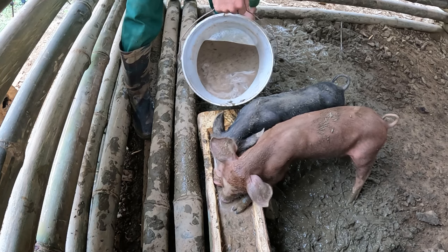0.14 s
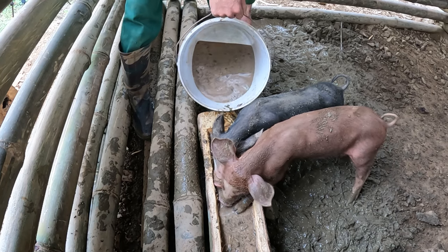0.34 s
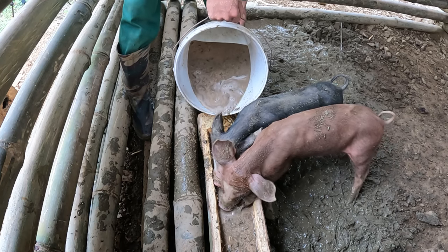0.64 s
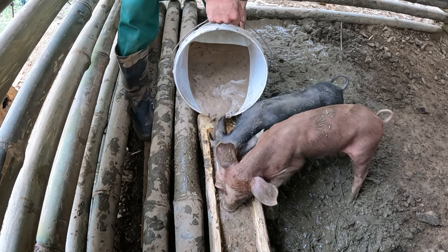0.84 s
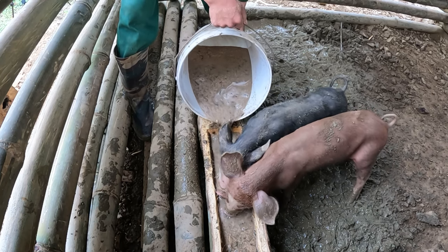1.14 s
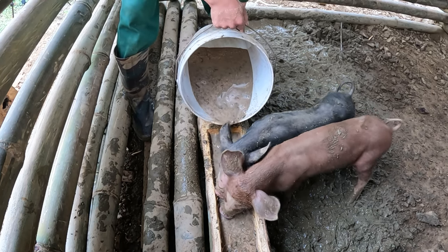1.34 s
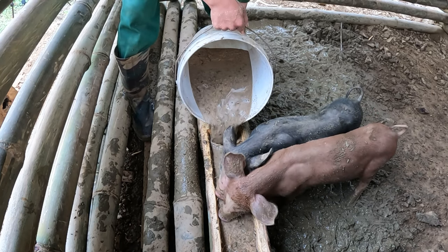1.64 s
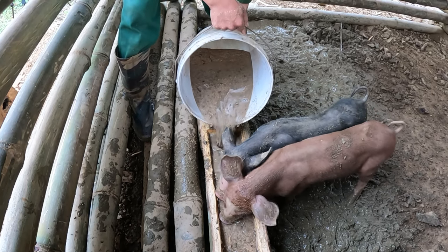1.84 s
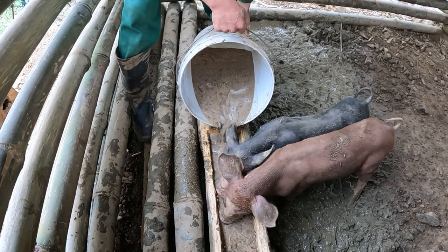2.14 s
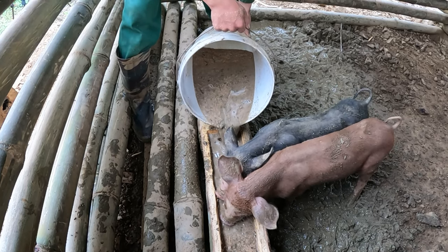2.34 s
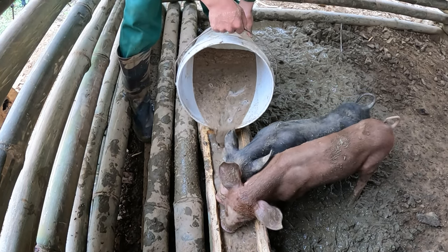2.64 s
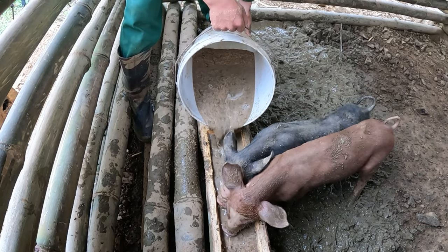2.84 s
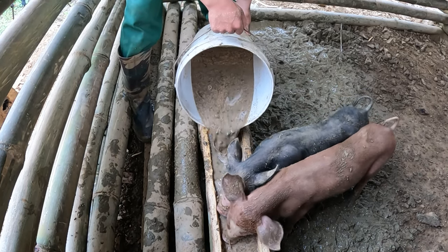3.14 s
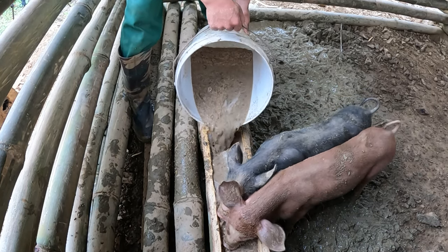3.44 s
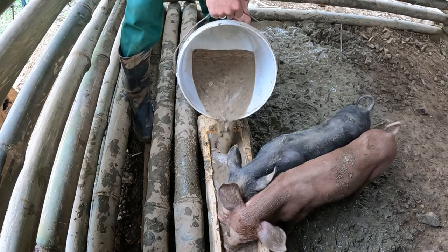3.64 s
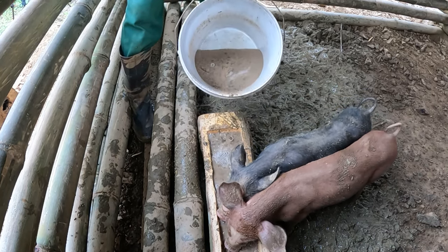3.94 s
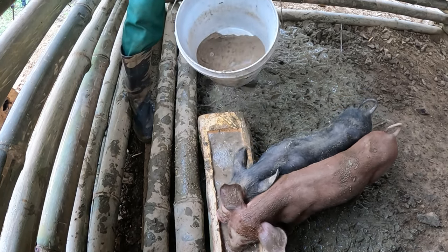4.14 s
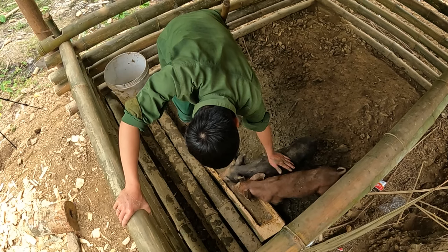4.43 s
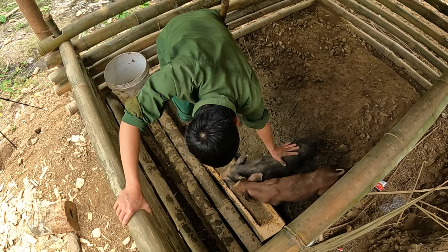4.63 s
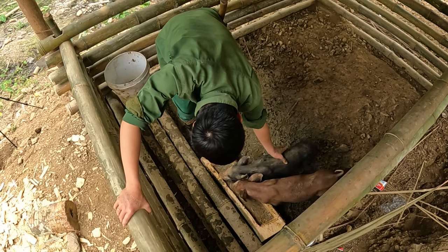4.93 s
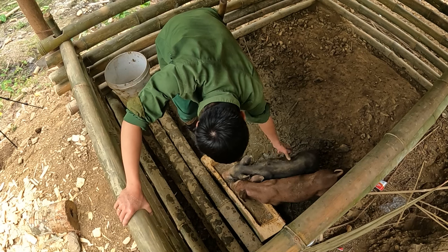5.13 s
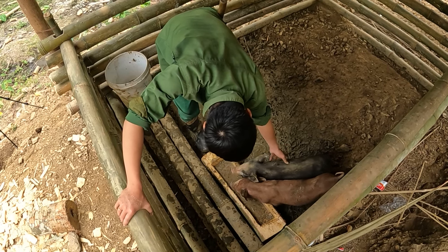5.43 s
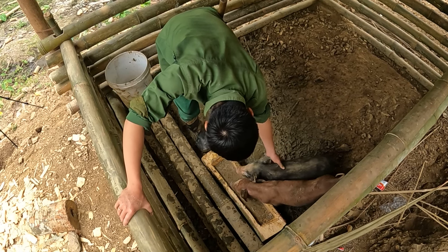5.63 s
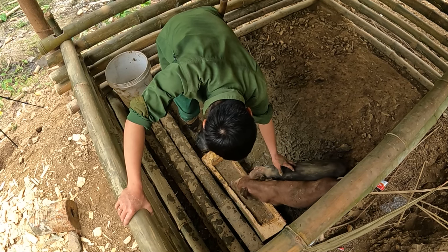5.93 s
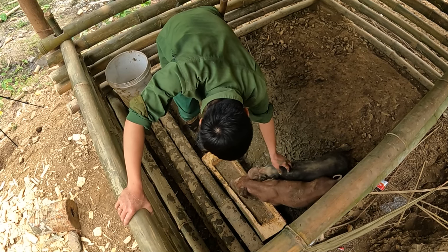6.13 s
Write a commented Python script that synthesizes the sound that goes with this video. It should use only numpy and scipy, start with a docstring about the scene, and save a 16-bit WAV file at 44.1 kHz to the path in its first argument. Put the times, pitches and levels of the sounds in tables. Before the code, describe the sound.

Very close outdoor pickup of two piglets eating at a trough. Thick wet feed gurgles and splatters as it pours, while rapid juicy smacks, chews, squelches and short slurps overlap, with soft low bumps on the trough. After about four seconds the close feeding stops abruptly, leaving a few faint, slightly echoing smacks over low wind rumble and thin outdoor hiss.

```python
"""Two piglets feed at a wooden trough in an open bamboo pen; a light wind and outdoor hiss, both noise, run
throughout. From the start wet mash pours in, random bubbles and clicks, while smacks and chews ring a mouth
cavity with wet bursts. From 0.2 s come sips of hissing grains, bumps of decaying sines and hollow squelches;
from 0.9 s gliding air plops. At 4.37 s the close sounds stop abruptly and the mash falls away. A few weaker,
more echoing smacks and squelches follow, with soft chews and sips, as the wind eases."""
import sys
import numpy as np
from scipy import signal
from scipy.fft import rfft, irfft, next_fast_len
from scipy.io import wavfile

SR = 44100
rng = np.random.default_rng(int(sys.argv[2]) if len(sys.argv) > 2 else 0)


def wav_out(sig):
    """Save sig, one row per channel (or a flat mono array), as 16-bit PCM at SR to the path in sys.argv[1]."""
    wavfile.write(sys.argv[1], SR, np.round(np.clip(np.atleast_2d(sig).T, -1, 1) * 32767).astype(np.int16))


N = 276948

# Outdoor hiss, spectrum shape. Each row: frequency in Hz, density in dB per Hz.
AIR_SPECTRUM = [(200, -8), (500, 7), (900, -21.5), (1350, 10.5), (2700, 2.5), (3800, 8), (5700, -1),
                (6900, 5.5), (7700, 1.5), (8700, -14.5), (12000, -10.5), (16000, -36)]
AIR_DB = -52

# Wind rumble, spectrum shape. Each row: frequency in Hz, density in dB per Hz.
WIND_SPECTRUM = [(8, -0.5), (22, 3.5), (40, -5.5), (60, -12.5), (100, -20), (170, -28), (300, -43),
                 (700, -87)]
# start level before the channel balance; rms gust swing; rate of gust turning points
WIND_DB, WIND_EASES_DB_PER_S, GUST_DB, GUSTS_PER_S = -27.5, 0.8, 2.5, 9

# Strength of the running, stirred mash, before the trims in mash().
# Each row: time in seconds, splatter level in dB, spray level in dB.
MASH_LEVELS = [(0.0, -17, -49), (0.31, -45, -50.5), (0.5, -23.5, -40), (0.7, -26.5, -40),
               (1.2, -22.5, -30.5), (1.55, -26.5, -34.5), (2.05, -23.5, -31.5), (2.22, -33, -38),
               (2.45, -22.5, -35.5), (2.8, -26.5, -27), (2.95, -26.5, -37), (3.15, -21, -32),
               (3.45, -22.5, -27.5), (3.9, -23.5, -31), (4.18, -34, -42.5), (4.36, -28, -40),
               (4.41, -55, -68), (4.52, -37, -46), (4.85, -55.5, -64.5), (5.22, -56.5, -54.5),
               (6.0, -46.5, -45), (6.28, -48, -47.5)]
# Splatter clicks, spectrum shape. Each row: frequency in Hz, density in dB per Hz.
SPLATTER_SPECTRUM = [(200, -24), (400, -32), (700, -17), (1000, 3), (1500, -14), (2200, -7), (3300, -2.5),
                     (4300, -21.5), (6000, -48.5), (12000, -53)]
GURGLE_DB = -16.5   # large bubbles, relative to the splatter
BLIP_DB = -5.5   # longer-ringing bubbles, relative to the middle ones

# Smacks of lips and tongue. Each row: start in seconds, mouth level in dB over 10 ms, cavity pitch in Hz,
# burst spread in seconds, spray in dB re mouth, jaw opening in dB re smack.
SMACKS = [(0.002, -20.5, 1620, 0.0068, -30, -8), (0.096, -14.5, 950, .009, -4.5, -11.5),
          (0.152, -22, 2060, 0.015, -24, -14), (0.353, -27, 1230, 0.011, -30, -29),
          (0.423, -15.5, 1660, 0.0029, -34, -29), (0.502, -13, 3000, 0.0043, -29, -6),
          (0.613, -25, 1150, 0.0042, -30, -5), (0.749, -25, 2830, 0.01, -9.5, -1.5),
          (0.871, -10.5, 1740, 0.005, -20.5, -15), (0.923, -20, 1180, 0.0057, -13, -4),
          (0.939, -15.5, 1270, 0.0042, -13, -24), (1.0, -21, 2400, 0.0099, -9.5, -17),
          (1.028, -11, 1740, .004, -19, -21), (1.061, -22.5, 2200, 0.0024, -14, -26),
          (1.178, -17.5, 950, 0.0056, -36, -1), (1.2, -13, 3220, 0.0047, -27, -22),
          (1.377, -25.5, 1180, 0.0098, -8, -9.5), (1.412, -21, 1440, 0.011, -24, -14.5),
          (1.437, -17, 2970, 0.0077, 1, 3), (1.481, -23.5, 1820, 0.0053, -11, -8),
          (1.547, -26, 910, 0.0059, -32, -11), (1.649, -22, 1490, 0.0061, -10.5, -10),
          (1.68, -24.5, 1900, 0.0046, -11, -9), (1.839, -18.5, 1250, 0.007, -5, -2.5),
          (1.851, -10.5, 2000, 0.0089, -16.5, -17), (2.011, -21, 2050, 0.017, -16, -4),
          (2.044, -16.5, 1960, 0.0092, -13, -4), (2.26, -18.5, 1940, 0.011, -15.5, -10),
          (2.283, -14, 1140, 0.0089, -11.5, -18), (2.339, -21.5, 1074, .008, -13.5, -12),
          (2.421, -21, 1680, 0.0069, -21, -0.5), (2.513, -21, 1020, 0.0083, 1, 0.5),
          (2.549, -15.5, 1340, .005, -18, -15), (2.705, -17, 1110, 0.0099, 3.5, -2.5),
          (2.764, -18.5, 1130, .004, -25, -7), (2.833, -19, 3700, 0.0048, -8.5, -17),
          (2.996, -15.5, 1000, 0.0044, -12.5, -6.5), (3.117, -19.5, 1820, .007, -9.5, -5),
          (3.176, -21, 970, .010, -28, 4.5), (3.201, -19.5, 1830, 0.0067, -0.5, -0.5),
          (3.33, -28, 940, 0.0086, -2, -27), (3.393, -15, 2650, 0.0045, -10.5, -14.5),
          (3.431, -11, 1010, .006, -5.5, -20), (3.493, -16.5, 990, 0.0044, -15.5, -22),
          (3.594, -13, 1840, 0.0042, -31, -13), (3.695, -20, 970, 0.0093, -10, -11),
          (3.931, -24, 1100, 0.0059, -7, 1.5), (3.992, -27, 1240, 0.0042, -8, -27),
          (4.046, -8.5, 1830, 0.0072, -13.5, -18), (4.25, -11, 1770, 0.0038, -12.5, -16.5),
          (4.295, -27, 3380, 0.0062, -14, -11), (4.346, -15, 2940, 0.0039, -12, -3),
          (4.472, -35.5, 1380, .009, -20, -31), (4.698, -18.5, 1970, 0.0033, -10.5, -29),
          (4.707, -19.5, 3270, 0.0062, -12.5, -17), (4.781, -34, 1270, 0.0031, -14, -10),
          (4.956, -19, 3210, .003, -7, -18), (5.065, -32, 1320, 0.014, -16, -10.5),
          (5.321, -40.5, 3470, 0.0086, -8, -20), (5.734, -33.5, 3640, .003, -16, -27),
          (5.774, -40, 3260, 0.0062, -7, -18), (5.984, -36, 1780, 0.022, -9.5, -36),
          (6.012, -42, 2330, .012, -4, -29), (6.204, -44.5, 2190, 0.0062, -13, -31)]
# Wet films in the mouth, spectrum shape. Each row: frequency in Hz, density in dB per Hz.
MOUTH_SPECTRUM = [(350, -24), (650, -10), (950, 0.5), (1400, 4), (2000, 6), (3200, 7), (4200, -4.5),
                  (6000, -9), (12000, -82)]
# Fine spray of mouth and mash, spectrum shape. Each row: frequency in Hz, density in dB per Hz.
SPRAY_SPECTRUM = [(3000, -6), (4300, 2), (6400, 0), (8000, -5.5), (9200, -13), (10500, -11), (13000, -24.5),
                  (16000, -63.5)]
# Low body of smacks and squelches, spectrum shape. Each row: frequency in Hz, density in dB per Hz.
HOLLOW_SPECTRUM = [(90, -16.5), (200, 7.5), (350, 11), (480, 5), (680, 18), (1000, -34.5), (3000, -41.5)]
# the opened jaw rings lower than most smacks: delay, centre pitch, burst spread, spray re mouth
OPEN_AFTER_S, OPEN_HZ, OPEN_SPREAD_S, OPEN_SPRAY_DB = .016, 951, .008, -18.5
# power share of the mouth sound that rings the cavity; centre pitch of the spray squeak; low body re mouth
RING_SHARE, LIP_GAP_HZ, HOLLOW_DB = 0.75, 5547, -34

# mean rate; level re the splatter column; +- level range; centre pitch; spray re mouth
CHEWS_PER_S, CHEW_DB, CHEW_SPREAD_DB, CHEW_HZ, CHEW_SPRAY_DB = 9, -1, 3, 1383, -15.5

# Thin slurping hisses and soft swishes. Each row: start in seconds, level in dB, pitch in Hz, length in seconds.
SIPS = [(0.209, -35.5, 5270, 0.028), (0.741, -38, 5460, 0.022), (1.29, -24, 5600, 0.024),
        (1.708, -37, 5900, 0.065), (2.959, -31.5, 3020, 0.029), (3.163, -24.5, 2100, 0.03),
        (4.422, -50, 4160, 0.15), (4.487, -48, 5100, 0.12), (4.66, -54, 4320, 0.039),
        (4.716, -43.5, 4950, 0.052), (5.629, -50.5, 3700, 0.062)]

# Soft bumps on the trough. Each row: start in seconds, peak in dB, pitch in Hz, 60 dB decay in seconds.
BUMPS = [(0.212, -20, 175, 0.014), (0.86, -28, 70.5, 0.052), (1.319, -24, 152, 0.031),
         (2.078, -15.5, 27.3, 0.63), (2.191, -20.5, 59.6, 0.11), (2.404, -12, 113, 0.023),
         (2.822, -29, 91, 0.049)]

# A snout pushes into the mash. Each row: start in seconds, level in dB over 10 ms.
SQUELCHES = [(0.215, -30), (0.247, -27), (0.543, -31), (0.69, -36), (0.82, -35), (0.987, -28), (1.312, -26),
             (1.481, -30.5), (1.89, -27), (1.971, -30.5), (2.341, -32), (2.421, -28), (2.552, -39.5),
             (2.591, -29), (2.819, -25.5), (2.849, -26.5), (3.06, -29.5), (3.142, -26), (3.261, -30.5),
             (3.491, -26), (3.58, -29.5), (3.735, -32.5), (3.815, -33.5), (3.931, -32.5), (4.06, -27),
             (4.167, -37.5), (4.752, -41.5), (5.048, -46), (5.101, -50), (5.37, -59)]
# burst spread; centre pitch; dull smack re the row's level; spray re mouth
SQUELCH_SPREAD_S, SQUELCH_HZ, SQUELCH_MOUTH_DB, SQUELCH_SPRAY_DB = .009, 925, 4.5, -18

# Air pockets in the mash. Each row: start in seconds, level in dB before the swell, start pitch in Hz,
# length in seconds, glide in octaves per second.
PLOPS = [(0.944, -15, 1150, .014, 3), (1.455, -12, 930, .012, 0), (2.245, -27, 950, .02, 0),
         (3.146, -17, 830, .016, -10), (3.226, -22, 900, .016, 0), (3.232, -27, 550, .025, -3),
         (3.335, -23, 680, .025, -5), (3.446, -16, 960, .02, 3), (3.497, -16, 940, .016, 0),
         (3.655, -21, 680, .022, -8), (4.353, -5.5, 970, .018, 0)]

STOP_S = 4.372   # the close sounds stop abruptly
PEN_T60_S = 0.069
# Channel likeness. Each row: frequency in Hz, correlation from 0 to 1.
LIKENESS = [(30, 0.74), (300, 0.95), (1000, 0.97), (3000, 0.79), (9000, 0.82), (13000, 0.61)]
# Channel colour. Each row: frequency in Hz, dB by which left is raised and right lowered.
TREBLE_PAN = [(200, 0.04), (600, -1), (1500, 0), (6000, 0.5), (9000, 1.3), (13000, 3)]
CUTOFF_HZ = 15900


def from_db(db):
    """Decibels to gain."""
    return 10 ** (np.asarray(db) / 20)


def rms_one(x):
    """Scale to unit power."""
    return x / np.sqrt(np.mean(x ** 2) + 1e-20)


def in_time(rows):
    """Interpolate each column of a curve at every sample."""
    s, *columns = np.transpose(rows)
    return [np.interp(np.arange(N) / SR, s, column) for column in columns]


def at_hz(points, hz):
    """Read a spectrum on a log-frequency axis."""
    f, value = np.transpose(points)
    return np.interp(np.log(hz + 1), np.log(f), value)


def colour(x, spectrum):
    """Causal (minimum-phase) filter with the given spectrum, by cepstrum folding."""
    size = 2 * next_fast_len(x.shape[-1] // 2 + 512)
    gain = from_db(at_hz(spectrum, np.fft.rfftfreq(size, 1 / SR)))
    cepstrum = irfft(np.log(gain))
    cepstrum[1:size // 2] *= 2
    cepstrum[size // 2 + 1:] = 0
    response = np.exp(rfft(cepstrum))
    return irfft(rfft(x, size) * response)[..., :x.shape[-1]]


def drift(rate_hz):
    """Random line segments with unit rms."""
    knots = np.arange(N) / SR * rate_hz
    return rms_one(np.interp(knots, np.arange(4096), rng.standard_normal(4096)))


def ring(x, hz, t60_s):
    """A damped two-pole resonance."""
    r = from_db(-60 / (t60_s * SR))
    w = 2 * np.pi * hz / SR
    return signal.lfilter([.5, 0, -.5], [1, -2 * r * np.cos(w), r * r], x + 1e-18)


def add(out, s, sound):
    """Mix a sound in at a time in seconds."""
    i = max(0, int(s * SR))
    out[i:i + len(sound)] += sound[:max(0, N - i)]


def stereo(mid, side):
    """Two channels share a mid; the side is weighted by how unlike they are at each frequency."""
    alike = np.clip(at_hz(LIKENESS, np.fft.rfftfreq(N, 1 / SR)), 0, 1)
    width = np.sqrt((1 - alike) / (1 + alike))
    return mid + irfft(rfft(side) * width, N) * np.array([[1], [-1]])


def crackle(per_s, spread_db, size):
    """Random clicks, many small and a few large."""
    chance = rng.random(size)
    big = rng.exponential(1, size)
    sign = rng.choice([-1, 1], size)
    return (chance < per_s / SR) * sign * from_db(spread_db * np.minimum(big, 4))


def noise(spectrum):
    """Steady coloured stereo noise."""
    return stereo(*rms_one(colour(rng.standard_normal((2, N)), spectrum)))


def air():
    """Outdoor hiss: faint steady noise."""
    return from_db(AIR_DB) * noise(AIR_SPECTRUM)


def wind():
    """A light gusty breeze rumbles on the microphone and slowly eases."""
    eased_db = WIND_DB - WIND_EASES_DB_PER_S * np.arange(N) / SR
    level_db = eased_db + GUST_DB * drift(GUSTS_PER_S)
    return from_db(level_db) * noise(WIND_SPECTRUM) * from_db([[-2.8], [1.8]])


def bubble(hz, cycles, slide, t):
    """One bubble decays 60 dB in some cycles while its pitch slides by a share."""
    age = t * hz / cycles
    bend = 1 + slide * np.minimum(age, 1) / 2
    return from_db(-60 * age) * np.sin(2 * np.pi * hz * t * bend)


def bubbles(per_s, low_hz, high_hz, cycles, spread_db, size=1024):
    """Bubbles of many sizes burst at random, most of them rising in pitch."""
    out, t = np.zeros(N), np.arange(size) / SR
    dice = np.random.default_rng(rng.integers(2 ** 31))
    for when, pitch, big, slide in dice.random((int(per_s * N / SR), 4)):
        hz = low_hz * (high_hz / low_hz) ** pitch
        size_db = spread_db * min(-np.log(1 - big), 3)
        add(out, when * N / SR, from_db(size_db) * bubble(hz, cycles, .6 * slide - .2, t))
    return rms_one(out)


def mash():
    """Thick feed gurgles, splatters and spits in uneven clumps; most bubbles damp quickly, a few ring on."""
    splatter_db, spray_db = in_time(MASH_LEVELS)
    clumps = from_db(2.95 * drift(60))
    large = bubbles(70, 290, 640, cycles=14, spread_db=4.0, size=2048)
    middle = bubbles(200, 720, 3800, cycles=19, spread_db=5.0)
    blips = bubbles(45, 650, 3200, cycles=36, spread_db=3.5, size=2048)
    small = bubbles(220, 3800, 11000, cycles=34, spread_db=5.5, size=512)
    clicks = rms_one(colour(crackle(700, 1.4, N), SPLATTER_SPECTRUM))
    splatter = rms_one(middle + from_db(BLIP_DB) * blips + .5 * clicks)
    spray = rms_one(colour(small + rms_one(crackle(720, 3.3, N)), SPRAY_SPECTRUM))
    body = from_db(splatter_db - 12) * (splatter + from_db(GURGLE_DB) * large)
    return clumps * (body + from_db(spray_db - 9.5) * spray)


def cluster(spread_s, t, low_hz, high_hz, cycles, count):
    """A handful of bubbles of different sizes burst close together."""
    when = np.abs(rng.normal(0, 1.1 * spread_s, (count, 1)))
    pitch = (np.arange(count)[:, None] + rng.random((count, 1))) / count
    hz = low_hz * (high_hz / low_hz) ** pitch
    slide, size_db = rng.normal(0, 1, (2, count, 1))
    tones = bubble(hz, cycles, 0.19 * slide, np.maximum(t - when, 0))
    rings = from_db(4.6 * size_db) * np.sqrt(hz) * tones
    return rms_one(rings.sum(axis=0))


def film_burst(spread_s, t, films_per_s=800):
    """Saliva films burst in quick succession and die away."""
    fade = np.exp(-t ** 2 / (2 * np.pi * spread_s ** 2))
    films = crackle(films_per_s, 3.0, len(t)) + 0.038 * rng.standard_normal(len(t))
    return rms_one(fade * films)


def hollow(spread_s, t):
    """Low-coloured films and a pair of large bubbles."""
    films = rms_one(colour(film_burst(spread_s, t), HOLLOW_SPECTRUM))
    return rms_one(films + cluster(spread_s, t, 272, 605, cycles=21.4, count=2))


def at_level(sound, db):
    """Give a sound of unit power the energy of 10 ms at this level."""
    return from_db(db) * np.sqrt(.01 * SR / len(sound)) * sound


def smack(db, hz, spread_s, spray_db, snap=0.69, cycles=15, glide_per_s=9, squeak=0.63, size=2560):
    """A wet seal snaps, then saliva films and bubbles burst and ring the mouth as it changes shape."""
    t = np.arange(size) / SR
    films, mist = film_burst(spread_s, t), film_burst(spread_s, t)
    films[int(min(spread_s, .02) * .4 * SR)] += snap * np.sqrt(size)
    cavity = ring(ring(films, hz, cycles / hz), hz, 4.0 / hz)
    warped_t = t + rng.normal(0, glide_per_s) * t ** 2 / 2   # the pitch slides up or down
    cavity = rms_one(np.interp(warped_t, t, cavity))
    wet_bubbles = cluster(spread_s, t, 850, 3500, cycles=24, count=4)
    froth = rms_one(rms_one(colour(films, MOUTH_SPECTRUM)) + wet_bubbles)
    mouth = rms_one(np.sqrt(RING_SHARE) * cavity + np.sqrt(1 - RING_SHARE) * froth)
    fine_bubbles = cluster(spread_s, t, 3360, 14250, cycles=34, count=6)
    fizz = rms_one(colour(fine_bubbles + mist + films, SPRAY_SPECTRUM))
    # the narrow gap between the lips picks out one high pitch
    lip_gap = rms_one(ring(mist, LIP_GAP_HZ * 2 ** rng.normal(0, 0.14), 0.017))
    spray = rms_one(fizz + squeak * lip_gap)
    low_body = from_db(HOLLOW_DB) * hollow(spread_s, t)
    return at_level(mouth + from_db(spray_db) * spray + low_body, db)


def smacks(start_s, end_s):
    """The lips part with a smack, then the jaw opens and the larger mouth rings."""
    out = np.zeros(N)
    for s, db, hz, spread_s, spray_db, open_db in SMACKS:
        if start_s <= s < end_s:
            add(out, s, smack(db, hz, spread_s, spray_db))
            open_hz = OPEN_HZ * 2 ** rng.normal(0, .15)
            add(out, s + OPEN_AFTER_S, smack(db + open_db, open_hz, OPEN_SPREAD_S, OPEN_SPRAY_DB))
    return out


def chews():
    """Small smacks at loose intervals, louder when there is more mash about."""
    out, level_db = np.zeros(N), in_time(MASH_LEVELS)[0]
    for k, (late, loud, pitch) in enumerate(rng.uniform(-1, 1, (128, 3))):
        s = (k + 1 + late / 2) / CHEWS_PER_S
        if s < N / SR:
            db = level_db[int(s * SR)] + CHEW_DB + CHEW_SPREAD_DB * loud
            add(out, s, smack(db, CHEW_HZ * 2 ** (.8 * pitch), .005, CHEW_SPRAY_DB))
    return out


def sips(half_width_hz=550):
    """A thin fluttering jet, dense clicks through two equal resonances, hisses around one pitch."""
    out = np.zeros(N)
    t60_s = np.log(1000) / (np.pi * 2 * half_width_hz)
    for s, db, hz, length_s in SIPS:
        size = int(length_s * SR)
        jet = crackle(4700, 2.4, size)
        for _ in range(2):
            jet = ring(jet, hz, t60_s)
        add(out, s, from_db(db) * rms_one(jet) * signal.windows.tukey(size, .7))
    return out


def bumps():
    """Snouts and feet nudge the heavy trough: decaying sines."""
    out, t = np.zeros(N), np.arange(SR // 2) / SR
    for s, db, hz, t60_s in BUMPS:
        add(out, s, from_db(db - 60 * t / t60_s) * np.sin(2 * np.pi * hz * t))
    return out


def squelches(start_s, end_s, size=3072):
    """A snout squeezes air out of the mash: a hollow gulp with a dull smack."""
    out, t = np.zeros(N), np.arange(size) / SR
    for s, db in SQUELCHES:
        if start_s <= s < end_s:
            add(out, s, at_level(hollow(SQUELCH_SPREAD_S, t), db))
            hz = SQUELCH_HZ * 2 ** rng.normal(0, 0.071)
            add(out, s, smack(db + SQUELCH_MOUTH_DB, hz, SQUELCH_SPREAD_S, SQUELCH_SPRAY_DB))
    return out


def plops():
    """Trapped air rings at one steady or gliding pitch until the mash closes over it."""
    out = np.zeros(N)
    for s, db, hz, length_s, glide in PLOPS:
        t = np.arange(int(length_s * SR)) / SR
        swell = signal.windows.tukey(len(t), .25) * np.exp(-.7 * t / length_s)
        phase = 2 * np.pi * np.cumsum(hz * 2 ** (glide * t)) / SR
        add(out, s, from_db(db) * swell * np.sin(phase))
    return out


def pen(x, wet_db, size=8192):
    """Trough walls and bamboo poles scatter a short tail: decaying noise echoes after 2 ms."""
    t = np.arange(size) / SR
    echoes = rng.standard_normal((2, size)) * from_db(-60 * t / PEN_T60_S) * (t > .002)
    mid, side = (signal.fftconvolve(x, rms_one(e) / np.sqrt(size))[:N] for e in echoes)
    return stereo(x + from_db(wet_db) * mid, from_db(1.5) * side)


def scene():
    """The close sounds stop abruptly and sparser, weaker, more echoing smacks follow; wind and outdoor hiss go
    on."""
    close = pen(smacks(0, STOP_S) + squelches(0, STOP_S) + plops() + bumps(), wet_db=-8)
    close = close * np.clip((STOP_S - np.arange(N) / SR) / .001, 0, 1)   # 1 ms fade, echoes included
    distant = pen(smacks(STOP_S, np.inf) + squelches(STOP_S, np.inf), wet_db=-4.5)
    running = pen(mash() + chews() + sips(), wet_db=-6.5)
    feeding = (close + distant + running) * from_db([[-.7], [.6]])
    return feeding + wind() + air()


def record(dry):
    """The two channels differ a little in colour; the highest peaks are rounded and the top is cut."""
    tilt_db = at_hz(TREBLE_PAN, np.fft.rfftfreq(N, 1 / SR)) * np.array([[1], [-1]])
    heard = irfft(rfft(dry) * from_db(tilt_db), N)
    rounded = heard / (1 + heard ** 6) ** (1 / 6)
    low_pass = signal.ellip(10, .1, 70, CUTOFF_HZ, fs=SR, output="sos")
    return signal.sosfilt(low_pass, rounded)


dry = scene()
out = record(dry)
wav_out(out)
```